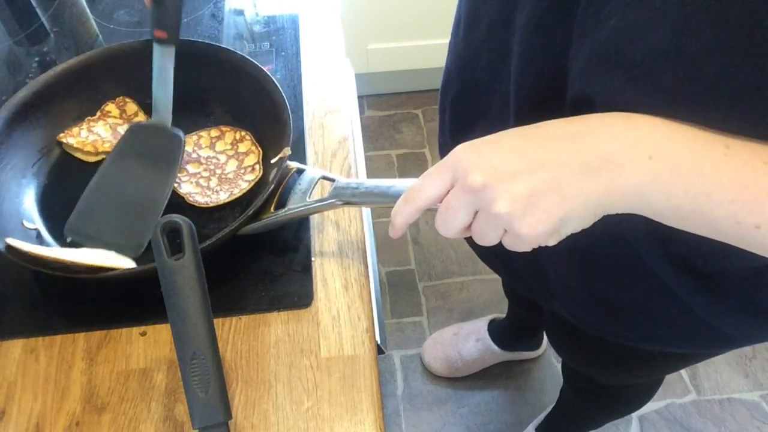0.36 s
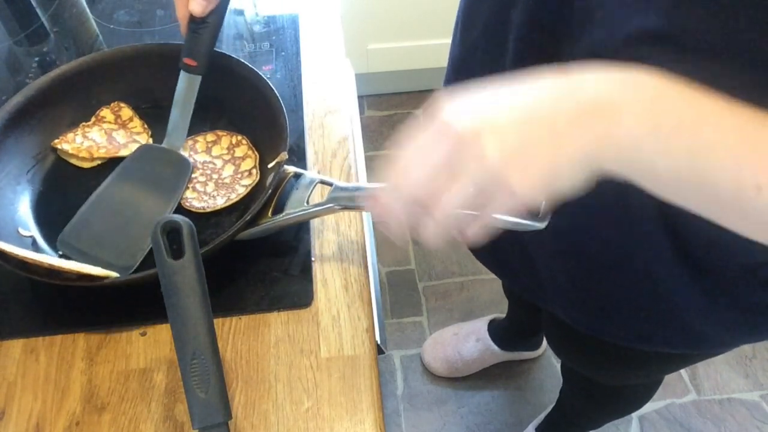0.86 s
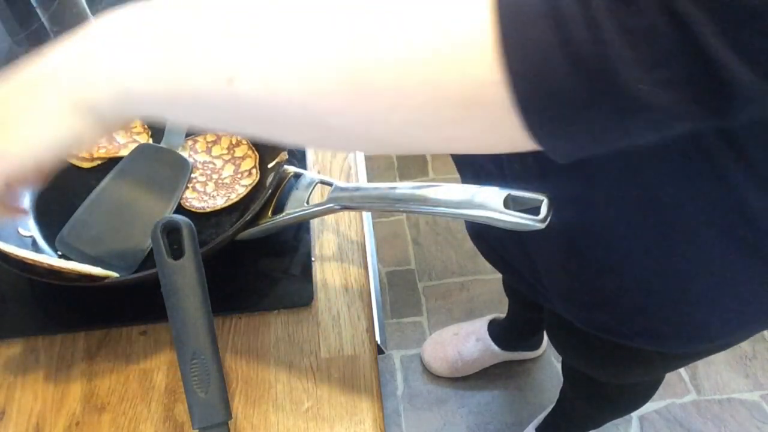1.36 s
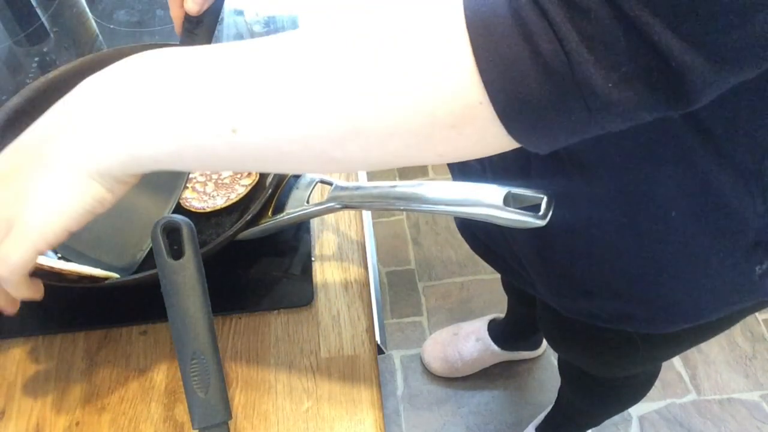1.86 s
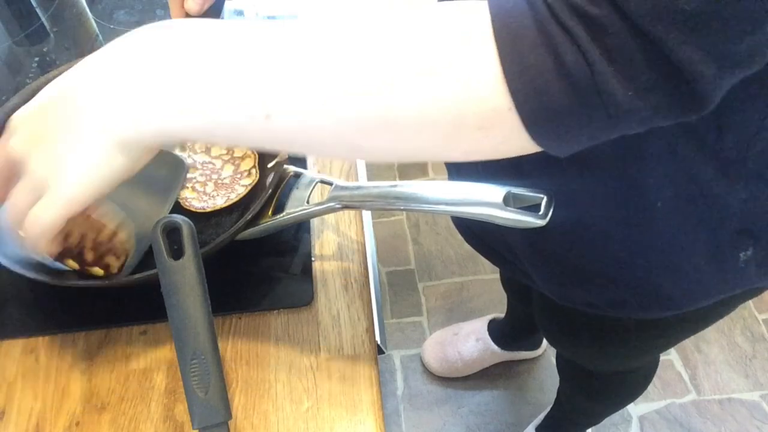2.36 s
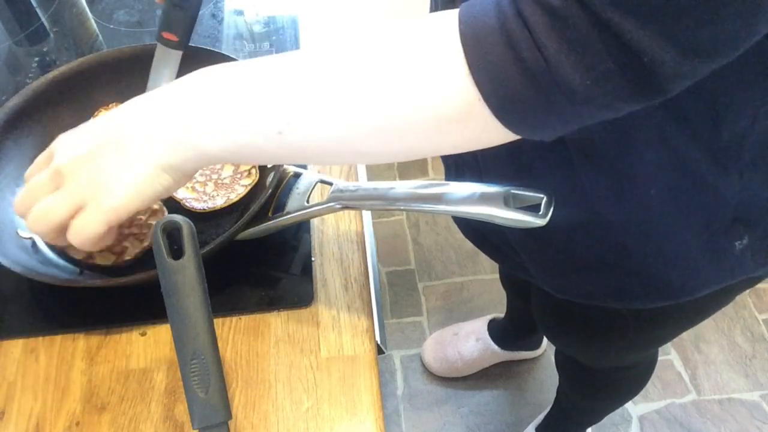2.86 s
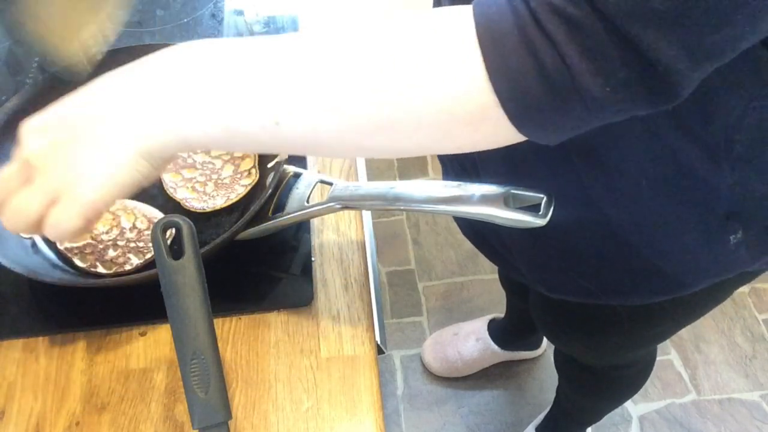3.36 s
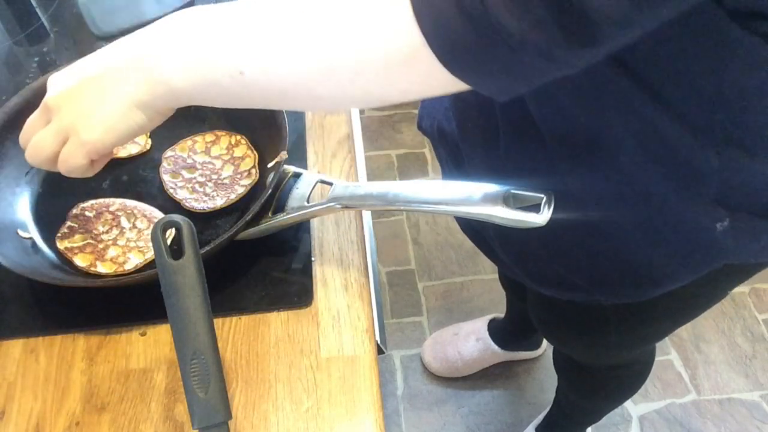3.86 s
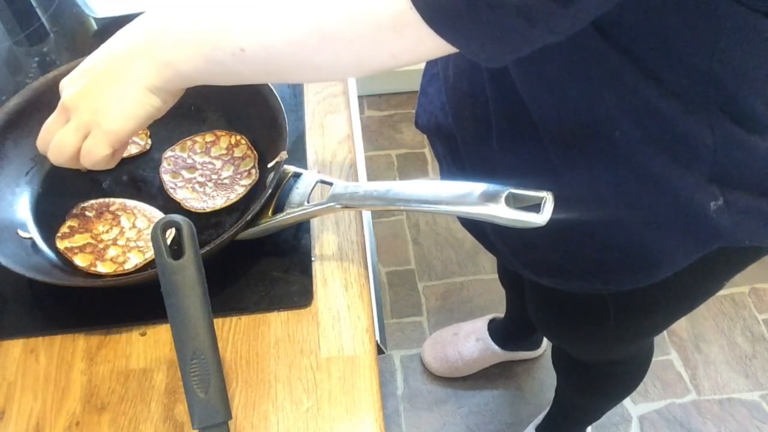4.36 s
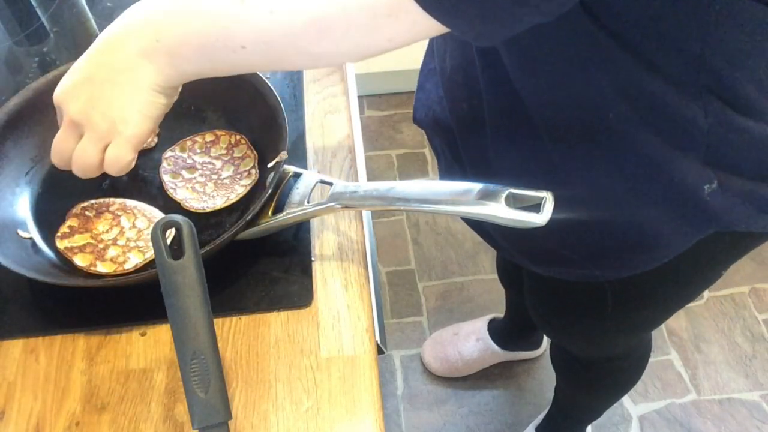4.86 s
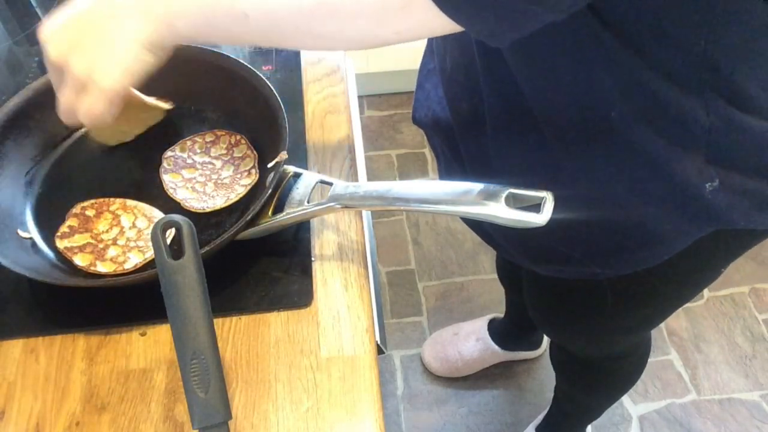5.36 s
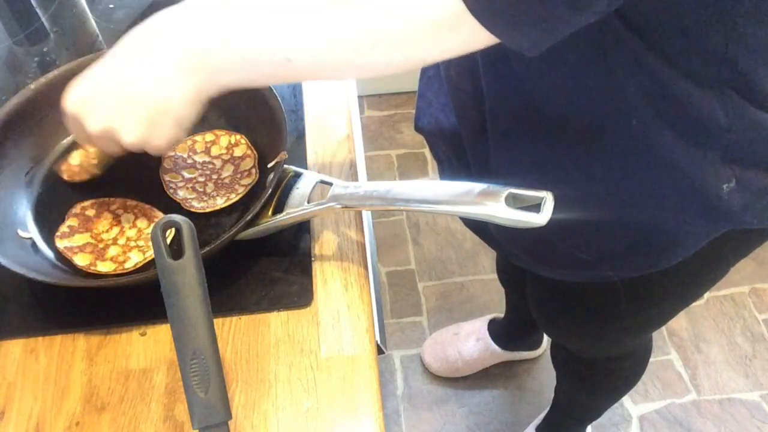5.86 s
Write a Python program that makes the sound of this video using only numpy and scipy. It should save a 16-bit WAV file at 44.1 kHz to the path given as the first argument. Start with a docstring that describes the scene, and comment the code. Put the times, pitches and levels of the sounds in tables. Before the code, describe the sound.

Close in a small hard-walled kitchen, an induction hob's fan drones softly with rushing air. Fat fizzes and spits, a spatula scrapes and ticks on the pan, and a short metallic ping starts a faint hum and whine. The frying grows stronger midway, then a plastic utensil drops on the worktop with a loud double clack and brief clatter; quiet fizzing and another ping follow.

```python
"""A fan's drone with rushing air and the fizz of frying are heard first: pancakes in a pan on an induction hob.
The fan is tones on multiples of its turn rate over filtered noise; frying is noise with short ringing bursts.
The coil switches on with a ping of the pan, then hums and whines; fat spits, a spatula and fingers tap and rub.
Once a plastic utensil drops onto the worktop with a double clack: struck modes, cracks and rattle.
Decaying noise stands for the reflections of the hard-walled kitchen."""
import sys
import numpy as np
from scipy import signal
from scipy.fft import rfft, irfft
from scipy.io import wavfile

SR = 44100
rng = np.random.default_rng(int(sys.argv[2]) if len(sys.argv) > 2 else 0)


def attenuation_scalar(level_db):
    """Turn a level in dB into a linear amplitude multiplier (20 dB per decade)."""
    decades = np.asarray(level_db, float) / 20
    return 10 ** decades


def to_wav(s):
    """Save 16-bit WAV."""
    ch = np.atleast_2d(s).T  # columns
    pcm = np.round(np.clip(ch, -1, 1) * 32767)  # PCM
    wavfile.write(sys.argv[1], SR, pcm.astype(np.int16))


N = 264067  # length in samples

# Reverberation time of the kitchen: (f/Hz, t60/s)
ROOM_T60 = [(80, 0.51), (400, 0.42), (1500, 0.37), (3000, 0.43), (4800, 0.49), (6500, 0.53), (11000, 0.34),
            (15000, 0.15)]
# Colour of the reflections at the start of the tail: (f/Hz, level/dB)
ROOM_COLOUR = [(80, 0.1), (200, -0.3), (400, -4.5), (1000, -1.2), (3000, -2.7), (5000, 2.6), (7000, -1),
               (15000, -2.5)]
ROOM_EDGES_HZ = 22.0 * 2 ** np.arange(0, 9.6, .5)  # half-octave bands
# Levels sent to the room; spits and taps are close, so they wake the kitchen less
ROOM_DB, NEAR_ROOM_DB, PING_ROOM_DB = -4.5, -4.5, -5

FAN_HZ = 27.28  # turns per s
# Tones of the cooling fan: (multiple of the turn rate, mean level/dB rms)
FAN_TONES = [(4, -80.5), (21, -87.5), (22, -85), (23, -93), (24, -72.5), (25, -90), (27, -91), (28, -84.5),
             (36, -95.5)]
# Relative spectral density of the fan's rushing air: (f/Hz, level/dB per Hz)
AIR_SPECTRUM = [(15, -38.5), (25, -9.5), (107, -5), (246, -9.5), (331, -6), (523, -10.5), (598, -18),
                (648, -5.5), (804, -10), (2060, -29.5), (6380, -23), (8580, -28), (12200, -33.5),
                (13900, -32), (15500, -29.5)]
AIR_DB = -70.5  # mean level, dB rms

# Spells of coil power: (on t/s, off t/s, ping drive level/dB, mean hum level/dB rms)
COIL_SPELLS = [(1.0503, 2.956, -53.5, -66.5), (5.807, 6.2, -53, -74.5)]
HUM_HZ = 101  # twice the mains rate
# Pan modes that whine under power: (f/Hz, level/dB rms)
WHINE_MODES = [(6304, -89), (6503, -85.5), (11117, -87), (12317, -88), (13378, -83.5), (13894, -101)]
# Modes of the pan base before damping: (f/Hz, relative level/dB, t60/s)
PAN_MODES = [(2490, -7, 0.16), (3217, -10, 0.31), (3740, -14, 0.046), (3720, -2, 0.076), (3980, -5, 0.5),
             (4280, -5, 0.095), (5050, -22, 0.093), (5900, -16, 0.12), (5940, -4, 0.18), (6220, 0.5, 0.26),
             (6550, -2.5, 0.47), (6800, -5, 0.1), (7680, -7, 0.32), (8900, -32, .3), (10330, -9, .1),
             (11300, -10, 0.07), (11680, 0, 0.094), (12700, -2, 0.084), (13350, -5, 0.17)]
PING_DAMPING = 7.5  # food and glass shorten the ring of the jolted pan by this factor
PING_CRACK_DB = 21.5  # gain of the broadband crack

# Frying and handling: (t/s, sizzle level/dB, spatula and finger rubbing level/dB, low rumble level/dB)
COOKING_LEVELS = [(0.0, -74, -78, -80), (0.18, -83, -78.5, -65), (0.25, -87, -66, -78),
                  (0.285, -80, -65.5, -67), (0.345, -78, -66, -74), (0.4, -80, -70.5, -68),
                  (0.55, -69.5, -72.5, -70.5), (1.0, -80, -74.5, -72), (1.498, -84, -81, -82),
                  (2.0, -79.5, -80.5, -73), (2.55, -73.5, -79.5, -76), (2.9, -84, -82, -76),
                  (3.15, -83, -73, -85), (3.25, -72.5, -80.5, -88), (3.35, -65, -82, -90),
                  (3.6, -64.5, -73, -95), (3.9, -65.5, -67.5, -82), (4.1, -68, -69.5, -88),
                  (4.25, -70.5, -71.5, -84), (4.45, -69.5, -74, -87), (4.7, -67, -73.5, -91),
                  (5.1, -73.5, -69.5, -75), (5.301, -73, -75, -83.5), (5.601, -73, -76.5, -101),
                  (5.99, -70.5, -78.5, -83)]
# Relative spectral density of the fizz: (f/Hz, level/dB per Hz)
SIZZLE_SPECTRUM = [(2500, -3.5), (5000, 3), (8000, 2), (11500, 5.5), (14000, 5), (15400, -0.5)]
# Relative spectral density of the rubbing: (f/Hz, level/dB per Hz)
RUB_SPECTRUM = [(500, -17), (1000, -7.5), (1300, -4), (1700, -4), (2200, -7), (3000, -6.5), (4000, -8.5),
                (7000, -18.5)]
# Tiny bubbles in the fat: (from f/Hz, to f/Hz, cycles in a t60, nominal rate per s, level/dB against the fizz)
CRACKLE_POPS = (9501, 14700.5, 39, 352, -3.5)
# The edge catches on the pan: (from f/Hz, to f/Hz, cycles in a t60, nominal rate per s, level/dB against rubbing)
RUB_TICKS = (1102, 4501, 13, 119.5, -5)

# Fat spits: (t/s, peak level/dB)
SPIT_EVENTS = [(0.149, -48), (0.267, -39), (0.2927, -47), (0.462, -41.5), (0.821, -50.5), (0.835, -50),
               (0.94, -48), (1.232, -57), (1.31, -49), (1.469, -46), (1.482, -47), (1.707, -40.5),
               (1.754, -48), (1.7845, -39.5), (1.901, -45), (2.1934, -49.5), (2.37, -37), (2.5088, -41),
               (2.7524, -38), (3.105, -36.5), (3.5164, -61), (3.552, -42), (3.9, -48), (4.013, -41),
               (4.183, -43), (4.2977, -39.5), (4.4982, -36), (4.61, -38), (5.171, -42), (5.2074, -42.5),
               (5.23, -40), (5.462, -37), (5.547, -49), (5.755, -50), (5.801, -56), (5.8845, -38.5)]
SPIT_HZ, SPIT_SPREAD = 11690, 0.07  # nominal pitch, and its scatter as a share
FLARE_DB, FLARE_T60_S = -24.5, 0.21  # fizz after a spit: level against the spit's peak, decay
# Taps on the pan: (t/s, peak level of the upper burst/dB, pitch f/Hz, low knock level/dB against that peak)
TAP_EVENTS = [(0.1483, -50.5, 1490, -30), (0.196, -55, 1490, -21), (0.202, -56.5, 1710, -20),
              (0.2668, -51.5, 1460, -8), (0.62, -60, 1330, -14), (0.819, -61, 1460, 6),
              (0.939, -55, 1540, -20), (1.084, -58, 1000, 8.5), (1.4803, -62, 1120, 5),
              (1.7855, -61, 5850, -22), (1.9016, -62, 2300, 1), (2.0084, -61.5, 2800, -1),
              (2.195, -56.5, 1980, -5), (2.267, -64.5, 1700, -10), (2.304, -67, 1500, -4),
              (2.378, -61, 2540, 1), (2.5056, -43, 1780, -2.5), (2.5057, -50, 4860, -18),
              (2.5106, -46.5, 2330, -2), (2.753, -53, 4280, -2.5), (3.045, -56, 3400, -24),
              (3.307, -47.5, 1700, -11), (3.3105, -50.5, 2120, -2), (3.314, -46.5, 1200, -20),
              (3.3203, -52, 1600, -11), (3.3767, -56, 800, -4), (3.3539, -52, 1830, -10),
              (3.858, -56.5, 3000, 3.5), (3.9013, -49, 2800, -3), (3.908, -50.5, 2850, -3),
              (3.986, -53, 1490, 0), (4.06, -60, 1080, 0), (4.115, -56, 2000, 2), (4.138, -64, 2400, -3),
              (4.1828, -55.5, 1710, -4), (4.247, -54.5, 1690, -18), (4.313, -52.5, 1170, -18),
              (4.3484, -58, 1520, -6), (4.408, -59, 2000, -10), (4.4506, -54, 1450, 0),
              (4.497, -55, 4570, -11), (4.67, -55, 1440, -18), (4.708, -54, 2940, -2.5),
              (5.1707, -52, 3910, -18), (5.2496, -60, 1120, -23), (5.3388, -55, 2660, -20),
              (5.4615, -53.5, 3316, -5.5), (5.685, -57, 1550, -2.5), (5.9684, -59, 2070, -13.5)]
# Soft bumps through the worktop: (t/s, peak level/dB, pitch f/Hz, length/s)
BUMP_EVENTS = [(3.31, -58.5, 80, 0.062), (3.914, -47.5, 131, 0.047), (4.765, -34.5, 129, 0.069),
               (4.8, -38.5, 80, 0.06)]

# Bounces of the dropped utensil; first the handle lands flat, then the blade's edge:
# (t/s, level/dB, contact passes from f/Hz, to f/Hz)
BOUNCES = [(4.7567, -37, 700, 3970), (4.7586, -41, 600, 4500), (4.764, -36.5, 496, 3030),
           (4.766, -18, 192.5, 657), (4.7688, -25, 900, 2570), (4.7716, -23, 201, 724),
           (4.7763, -20.5, 248.4, 744), (4.7995, -11.5, 1000, 4350), (4.8023, -14.5, 1100, 3900),
           (4.805, -13.5, 1100, 4020), (4.812, -19.5, 203, 3200), (4.819, -22, 400, 3000)]
# Modes of utensil and worktop: (f/Hz, relative level/dB before scatter, t60/s)
UTENSIL_MODES = [(168, -12, 0.028), (282, -7.5, 0.018), (400, 0.5, 0.015), (625, -8.5, 0.016),
                 (1000, -11, 0.015), (1200, 0.5, 0.012), (1484, 2, 0.015), (1780, 1.5, 0.017),
                 (2250, 3, 0.015), (2550, -2, 0.014), (2950, 6, 0.023), (3270, 0, 0.015), (4240, 0, 0.0062),
                 (5000, 3.5, 0.0063)]
MODE_SCATTER_DB = 2.0  # every bounce strikes another spot
RATTLE_DB, RATTLE_TOP_HZ = -20, 5360  # loose clatter after each bounce
SPLASH_DB = -30.5  # bright top of the clatter

MIC_LOW_HZ = 54.5  # the microphone loses the bass below
TOP_CUT_HZ = 15650  # steep upper band limit of the sound


def at_hz(points, hz):
    """Interpolation: reads a table on a logarithmic frequency axis."""
    table_hz, values = np.array(points).T[:2]
    return np.interp(np.log(hz), np.log(table_hz), values)


def rms_one(x):
    """Normalisation: scales to rms 1."""
    return x / np.sqrt(np.mean(x ** 2) + 1e-20)


def drift(rate):
    """Slow random modulation: lines join normal random knots of spread 1, 2 * rate of them per s."""
    knots = rng.standard_normal(int(N / SR * rate * 2) + 3)
    return np.interp(np.arange(N) / SR * rate * 2, np.arange(len(knots)), knots)


def band(x, low, high):
    """Band limiting: a Butterworth band-pass."""
    return signal.sosfilt(signal.butter(2, [low, min(high, .45 * SR)], "band", fs=SR, output="sos"), x)


def coloured(x, spectrum):
    """Spectral shaping: weights a flat signal by frequency, rms 1."""
    hz = np.maximum(np.arange(N // 2 + 1) * SR / N, 1)
    return rms_one(irfft(rfft(x) * attenuation_scalar(at_hz(spectrum, hz)), N))


def ring(x, hz, t60):
    """Damped resonance: a unit click sets a sine of initial height 1 ringing."""
    radius, angle = attenuation_scalar(-60 / (t60 * SR)), 2 * np.pi * hz / SR
    return signal.lfilter([0, np.sin(angle)], [1, -2 * radius * np.cos(angle), radius * radius], x + 1e-18)


def add(out, s, sound):
    """Superposition: mixes a short sound in at s seconds."""
    i = round(s * SR)
    out[i:i + len(sound)] += sound[:N - i]


def grains(per_s, spread_db):
    """Random impulses of either sign: mostly small, a few large."""
    sizes = attenuation_scalar(spread_db * np.minimum(rng.exponential(1, N), 5)) * rng.choice([-1, 1], N)
    return sizes * (rng.random(N) < per_s / SR)


def pops(low_hz, top_hz, cycles, per_s, db):
    """Clumped random excitation: tiny bursts each ring briefly at one of twelve pitches."""
    clicks = grains(per_s * attenuation_scalar(4.0 * drift(15)), spread_db=2.6)
    dealt = rng.integers(0, 12, N)
    pitches = np.geomspace(low_hz, top_hz, num=12)
    rings = sum(ring(clicks * (dealt == k), hz, cycles / hz) for k, hz in enumerate(pitches))
    return attenuation_scalar(db) * rms_one(rings)


def burst(hz, width, t60, rough):
    """Transient excitation: a click plus dying noise around one pitch, peak 1."""
    t = np.arange(2600) / SR
    push = rough * rng.standard_normal(len(t)) * attenuation_scalar(-60 * t / t60)
    push[0] += 1
    sound = band(band(push, hz / width, hz * width), hz / width, hz * width)
    return sound / np.abs(sound).max()


def kitchen(x):
    """Diffuse reverberation: dense reflections as noise that starts after 3 ms and dies band by band."""
    t = np.arange(SR // 2 + SR // 4) / SR
    white = rng.standard_normal((2, len(t)))
    tail = np.zeros(len(t))
    for k, (low, high) in enumerate(zip(ROOM_EDGES_HZ, ROOM_EDGES_HZ[1:])):
        centre = np.sqrt(low * high)
        level_db = at_hz(ROOM_COLOUR, centre) - 60 * t / at_hz(ROOM_T60, centre)
        tail += band(white[k % 2], low, high) * attenuation_scalar(level_db)
    tail *= np.clip((t - .003) / 0.0041, 0, 1)
    return signal.fftconvolve(x, tail / np.sqrt(np.sum(tail ** 2)))[:N]


def fan():
    """Periodic rotation: wavering tones on multiples of the turn rate over rushing air."""
    turn = 2 * np.pi * FAN_HZ * np.arange(N) / SR
    tones = np.zeros(N)
    for multiple, db in FAN_TONES:
        height = np.sqrt(2) * attenuation_scalar(db + 1.76 * drift(6.3))
        tones += height * np.sin(round(multiple) * turn + rng.uniform(0, 6.47))
    air = attenuation_scalar(AIR_DB + 2.9 * drift(3.3)) * coloured(rng.standard_normal(N), AIR_SPECTRUM)
    return tones + air


def coil():
    """Forced vibration: the field shakes the pan at twice the mains rate and keeps high modes whining."""
    t, out = np.arange(N) / SR, np.zeros(N)
    beat = np.sin(2 * np.pi * HUM_HZ * t)
    shake = (1 + 0.31 * beat) * rng.standard_normal(N)
    whine = sum(attenuation_scalar(db) * rms_one(ring(shake, hz, t60=0.035)) for hz, db in WHINE_MODES)
    for on, off, _, hum_db in COIL_SPELLS:
        powered = np.clip((t - on) / 0.016, 0, 1) * np.clip((off - t) / 0.034, 0, 1)
        hum = np.sqrt(2) * attenuation_scalar(hum_db + 1.8 * drift(3.47)) * beat
        out += powered * (hum + whine)
    return out


def ping():
    """Modal excitation: at switch-on the field jolts the pan, which rattles on the glass and rings."""
    jolt, t = np.zeros(N), np.arange(SR // 2) / SR
    for on, _, db, _ in COIL_SPELLS:
        decay = attenuation_scalar(-16.0 - 60 * t / 0.023) + attenuation_scalar(-24 - 60 * t / 0.38)
        add(jolt, on, attenuation_scalar(db) * rng.standard_normal(len(t)) * decay)
    crack = attenuation_scalar(PING_CRACK_DB) * band(jolt, 2300, 7100)
    return crack + sum(attenuation_scalar(db) * ring(jolt, hz, t60 / PING_DAMPING) for hz, db, t60 in PAN_MODES)


def bumps():
    """Low-frequency conduction: humps of low noise come through the worktop."""
    out = np.zeros(N)
    for s, db, hz, length in BUMP_EVENTS:
        count = int(length * SR)
        hump = np.r_[np.hanning(count), np.zeros(count)]
        lump = band(rng.standard_normal(2 * count) * hump, hz / 2, hz * 2.5)
        add(out, s, attenuation_scalar(db) * lump / np.abs(lump).max())
    return out


def taps():
    """Impact: a dull burst with a knock of the pan's low body."""
    out = np.zeros(N)
    for s, db, hz, knock_db in TAP_EVENTS:
        tap = burst(hz, width=1.684, t60=0.03, rough=0.82)
        knock = attenuation_scalar(knock_db) * burst(480, width=3.0, t60=0.039, rough=0.28)
        add(out, s, attenuation_scalar(db) * (tap + knock))
    return out


def spits():
    """Sudden pressure release: bursting steam pockets snap brightly."""
    out = np.zeros(N)
    for s, db in SPIT_EVENTS:
        hz = SPIT_HZ * (1 + SPIT_SPREAD * rng.uniform(-0.92, 1))
        add(out, s, attenuation_scalar(db) * burst(hz, width=1.94, t60=0.0082, rough=0.18))
    return out


def cooking():
    """Stochastic excitation: crackling fizz that flares after each spit, gritty rubbing and rumble."""
    times, *levels = np.transpose(COOKING_LEVELS)
    sizzle, rub, rumble = [attenuation_scalar(np.interp(np.arange(N) / SR, times, db)) for db in levels]
    flare = np.zeros(N)
    for s, db in SPIT_EVENTS:
        add(flare, s, attenuation_scalar(db + FLARE_DB - 60 * np.arange(SR) / SR / FLARE_T60_S))
    fizz = coloured(rng.standard_normal(N), SIZZLE_SPECTRUM) + pops(*CRACKLE_POPS)
    frying = (sizzle * attenuation_scalar(0.83 * drift(6.0)) + flare) * fizz
    grit = rng.standard_normal(N) + 0.6 * rms_one(grains(400 * attenuation_scalar(3.0 * drift(16)), spread_db=2.2))
    scrape = coloured(grit, RUB_SPECTRUM) + pops(*RUB_TICKS)
    rubbing = rub * attenuation_scalar(2.2 * drift(17)) * scrape
    low = rms_one(band(rng.standard_normal(N), 45.26, 125))
    return frying + rubbing + rumble * attenuation_scalar(1.2 * drift(2.07)) * low


def drop():
    """Modal impact: each bounce cracks, rattles and strikes, unequally, the modes its contact passes."""
    out, t = np.zeros(N), np.arange(5000) / SR
    for s, db, low_hz, high_hz in BOUNCES:
        click = band(1. * (t == 0), low_hz, high_hz)
        modes = np.zeros(len(t))
        for k, (hz, level_db, t60) in enumerate(UTENSIL_MODES):
            strength = attenuation_scalar(level_db + MODE_SCATTER_DB * rng.standard_normal())
            modes += strength * (-1) ** k * ring(click, hz, t60)
        crack = band(rng.standard_normal(len(t)) * attenuation_scalar(-60 * t / 0.0097), low_hz, high_hz)
        crack = band(crack, low_hz / 1.43, high_hz * 1.47)
        rattle = band(rng.standard_normal(len(t)) * attenuation_scalar(RATTLE_DB - 60 * t / 0.224), 720, RATTLE_TOP_HZ)
        splash = band(rng.standard_normal(len(t)) * attenuation_scalar(SPLASH_DB - 60 * t / 0.24), high_hz, 4 * high_hz)
        # modes and crack have equal peaks
        bounce = modes / np.abs(modes).max() + crack / np.abs(crack).max() + rattle + splash
        add(out, s, attenuation_scalar(db) * bounce)
    return out


def scene():
    """Superposition: sudden sounds wake the kitchen; steady ones already carry it."""
    near, fall, jolts = spits() + taps() + bumps(), drop(), ping()
    room = attenuation_scalar(ROOM_DB) * kitchen(fall + attenuation_scalar(NEAR_ROOM_DB) * near + attenuation_scalar(PING_ROOM_DB) * jolts)
    return (near + fall + jolts + room + coil() + cooking() + fan())[None]


def top_cut(x):
    """Nothing passes above the cut-off."""
    return signal.sosfilt(signal.butter(12, 16220, fs=SR, output="sos"), x)


def record(dry):
    """Band limitation: the microphone loses the deep bass; a separate steep filter then cuts the top."""
    bass_cut = signal.sosfilt(signal.butter(2, MIC_LOW_HZ, "high", fs=SR, output="sos"), dry)
    mix = signal.sosfilt(signal.cheby2(16, 50, TOP_CUT_HZ, fs=SR, output="sos"), bass_cut)
    return top_cut(mix)


dry = scene()
out = record(dry)
to_wav(out)
```